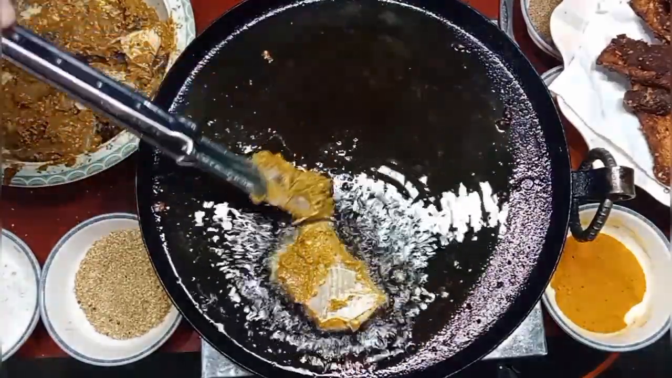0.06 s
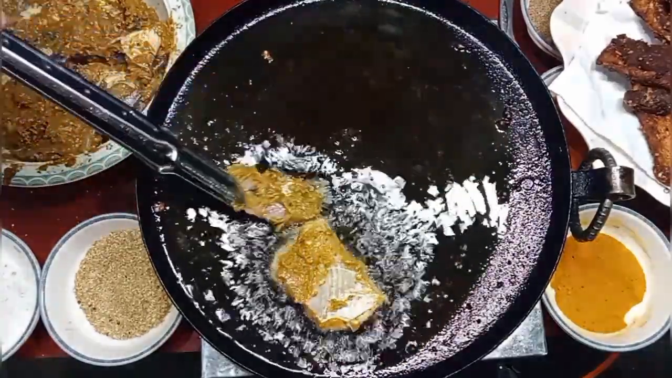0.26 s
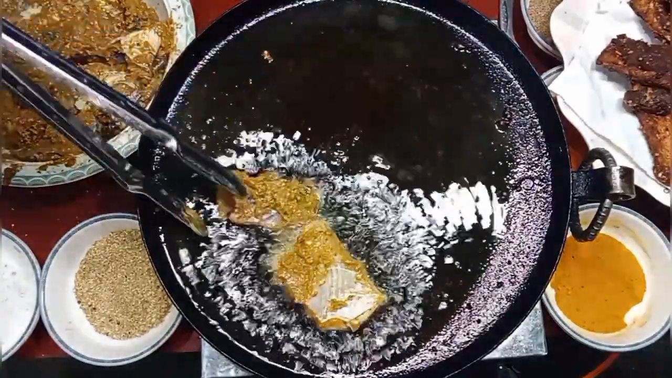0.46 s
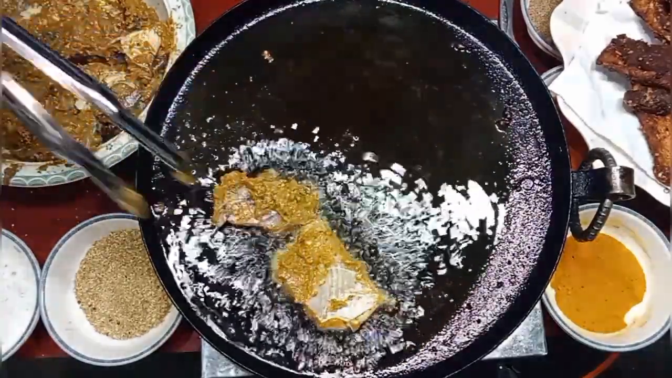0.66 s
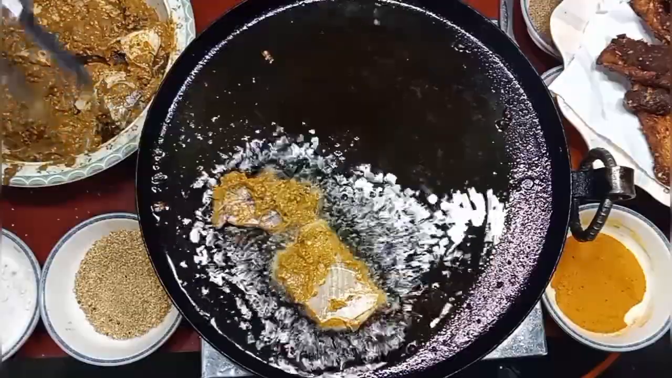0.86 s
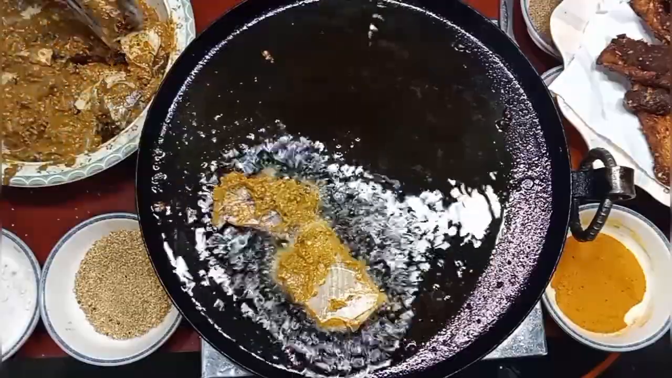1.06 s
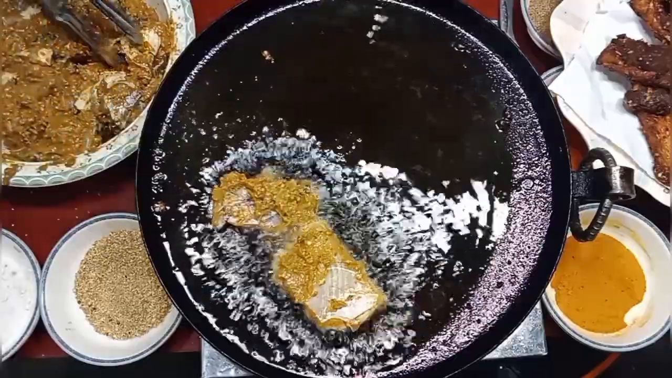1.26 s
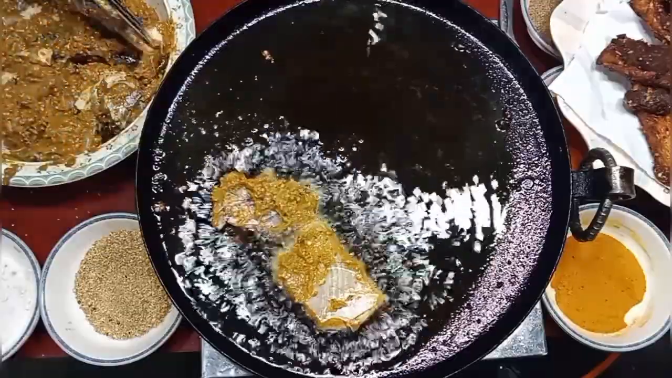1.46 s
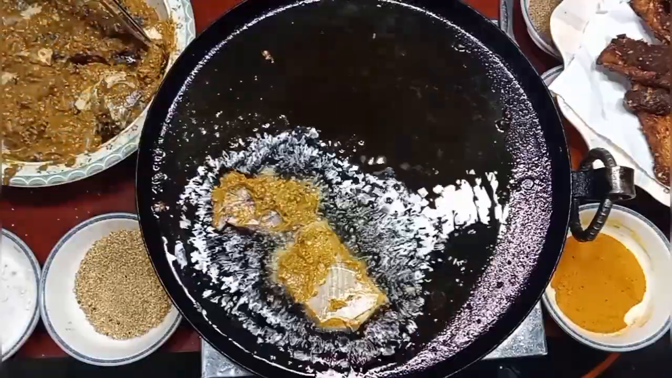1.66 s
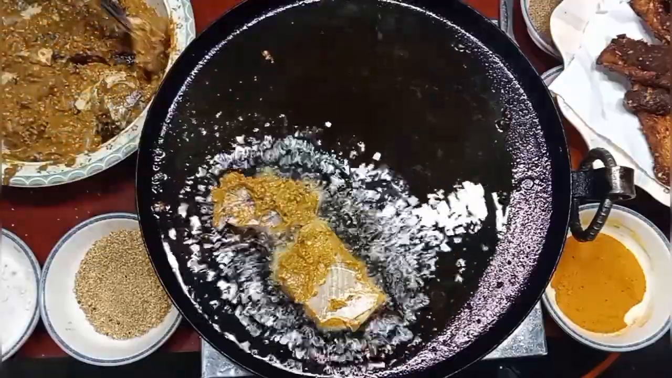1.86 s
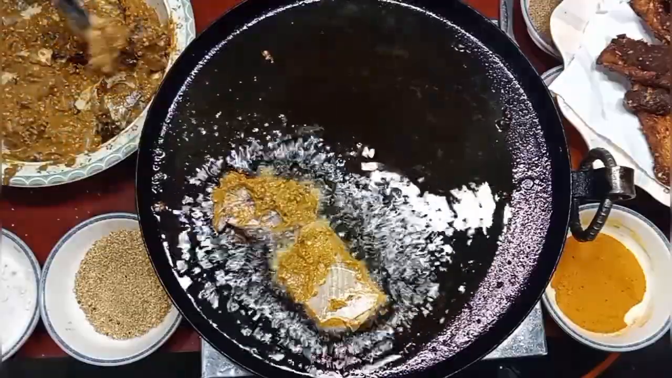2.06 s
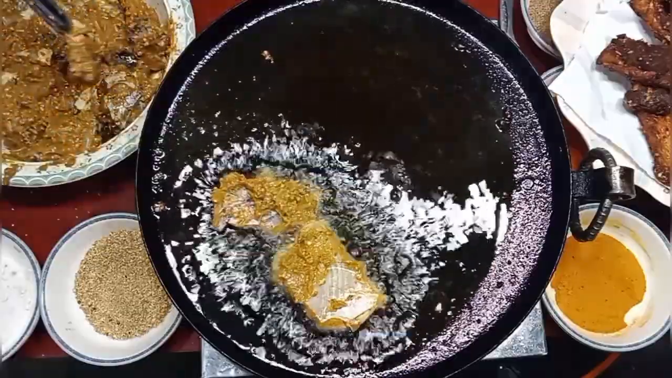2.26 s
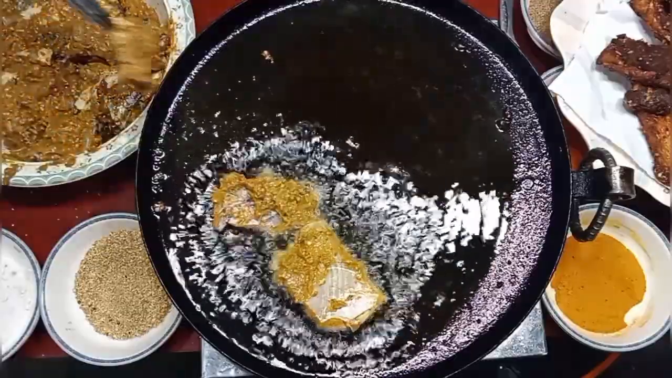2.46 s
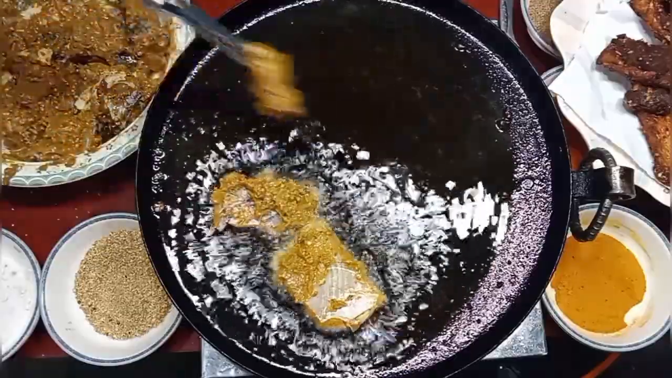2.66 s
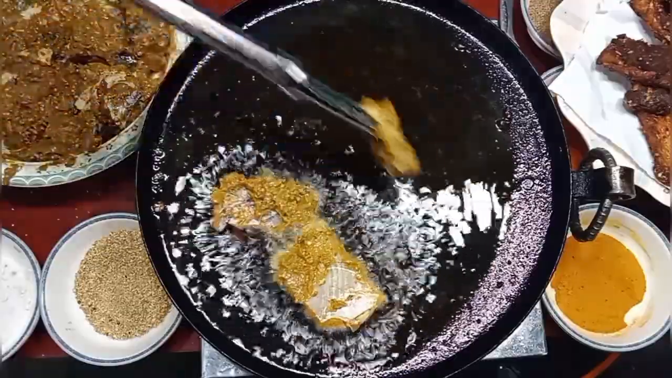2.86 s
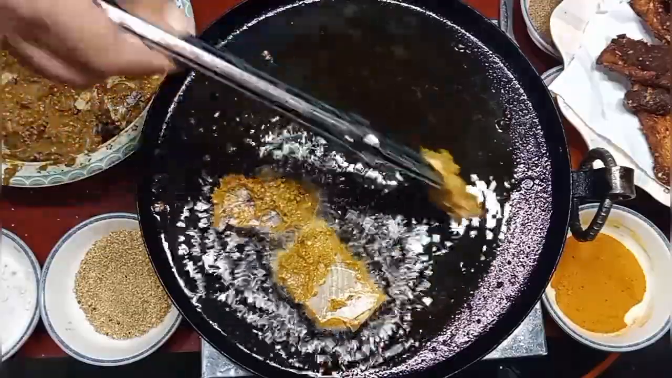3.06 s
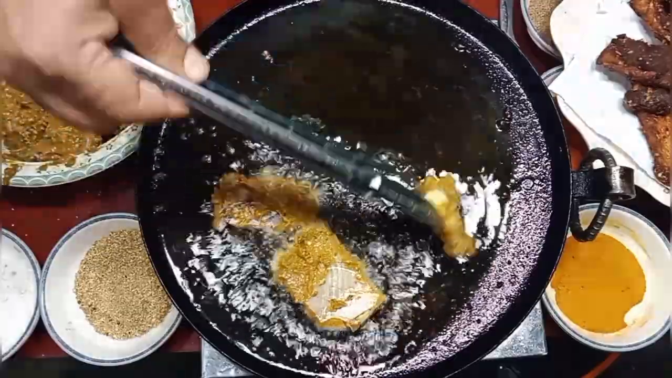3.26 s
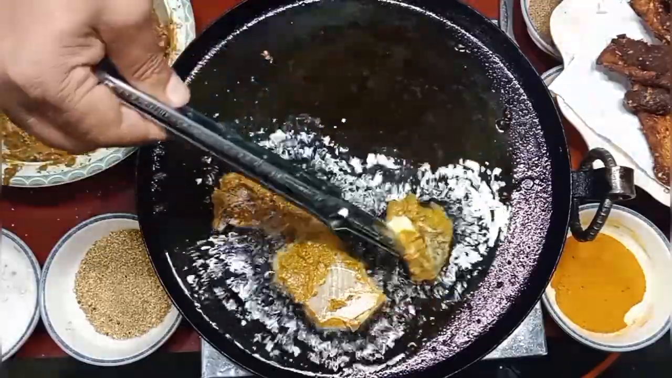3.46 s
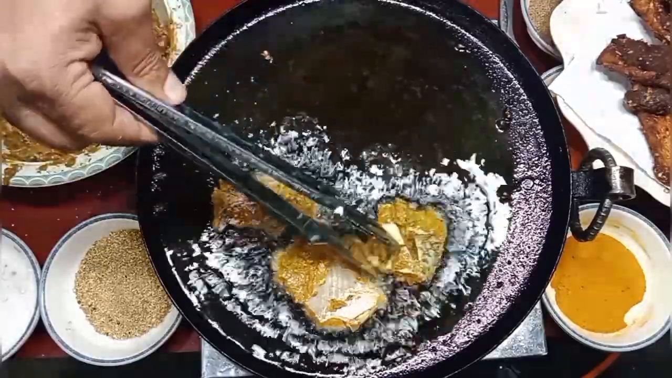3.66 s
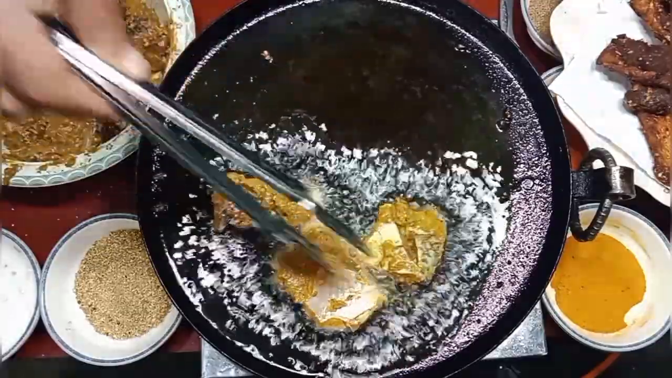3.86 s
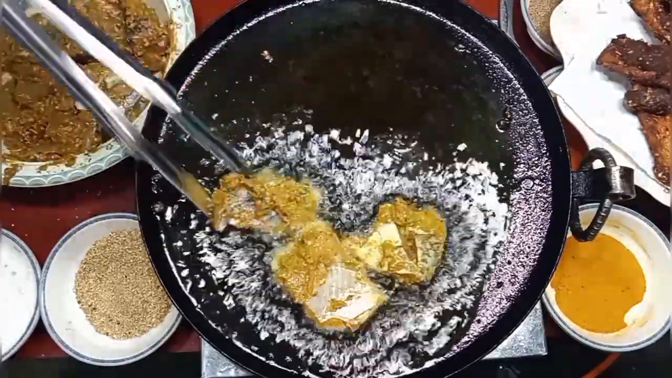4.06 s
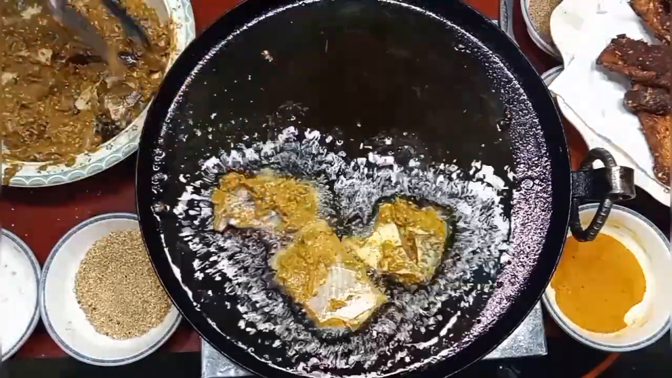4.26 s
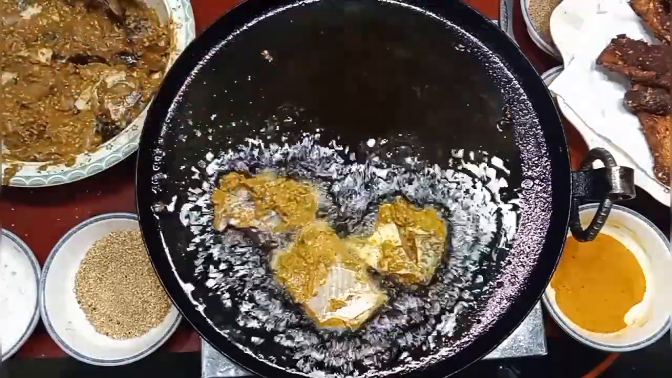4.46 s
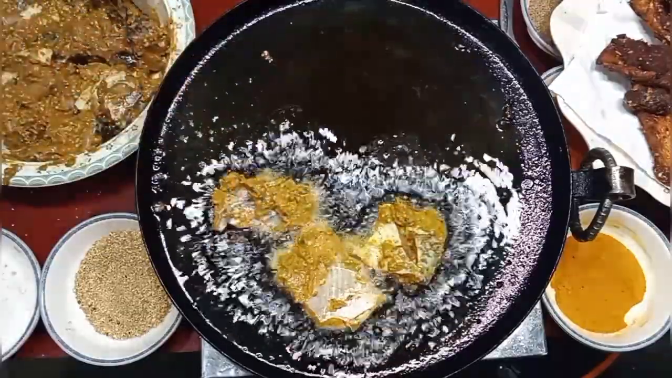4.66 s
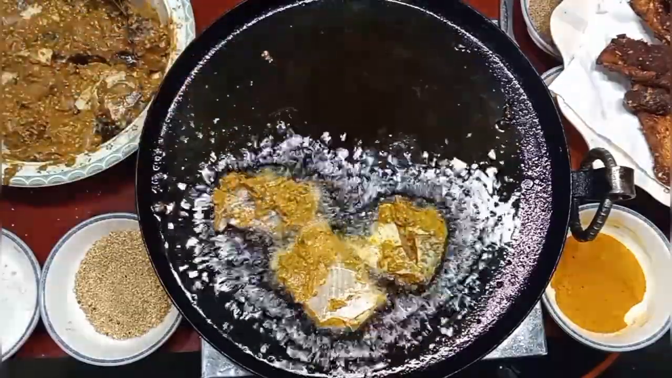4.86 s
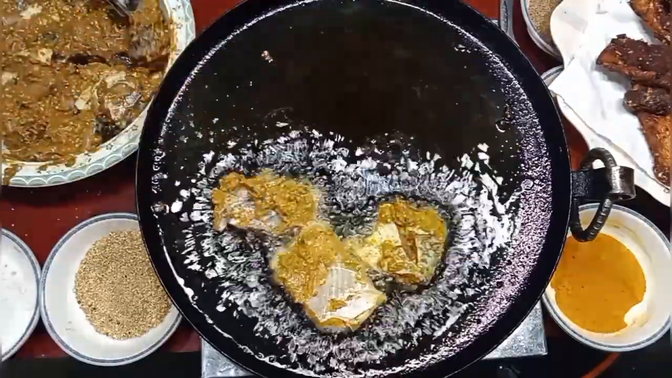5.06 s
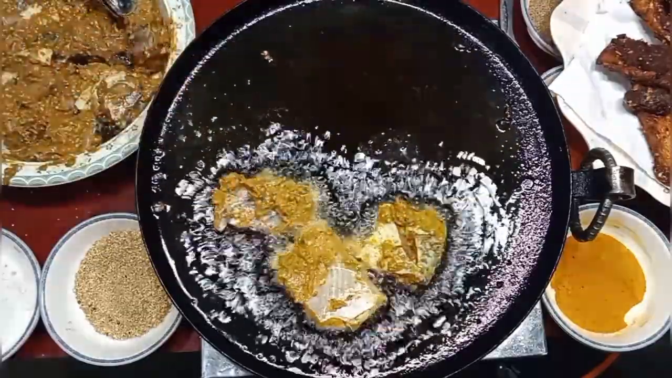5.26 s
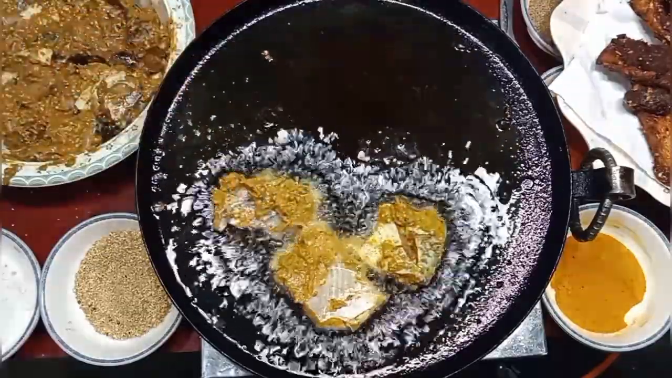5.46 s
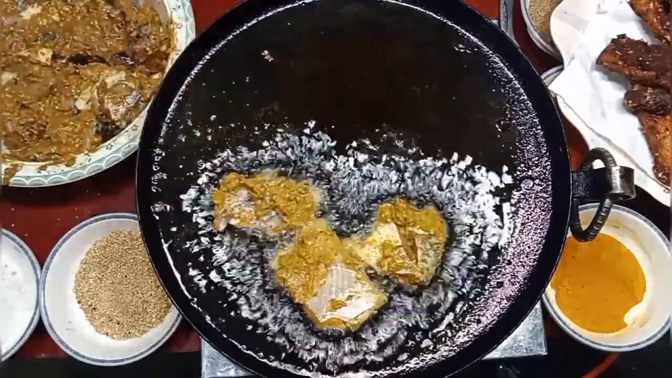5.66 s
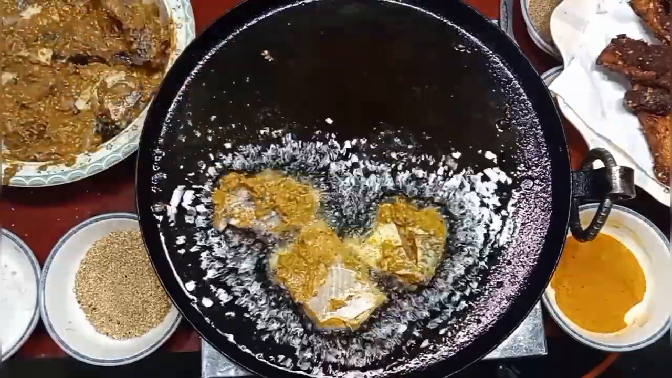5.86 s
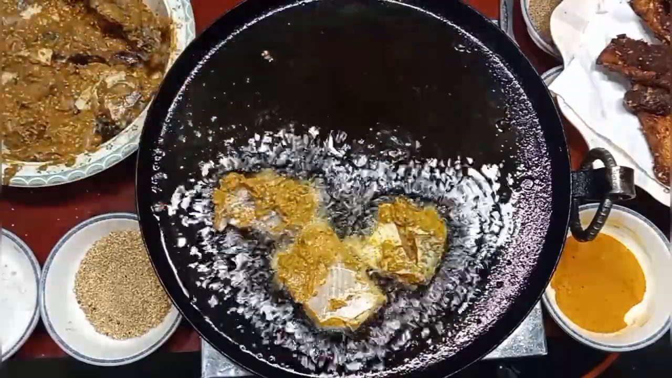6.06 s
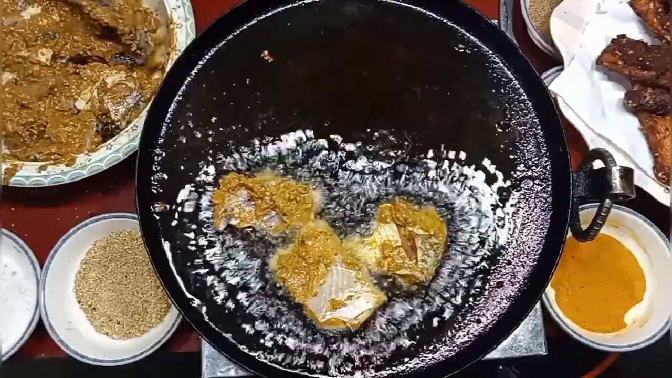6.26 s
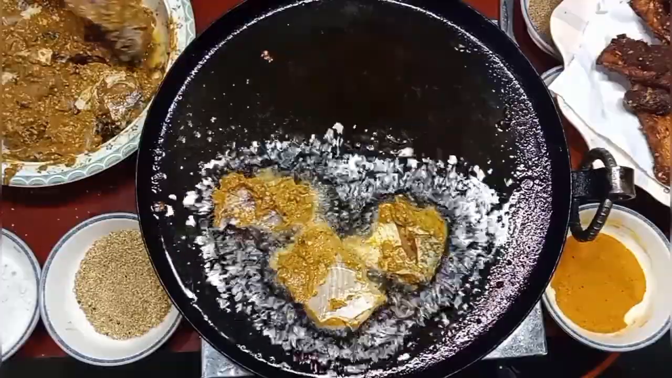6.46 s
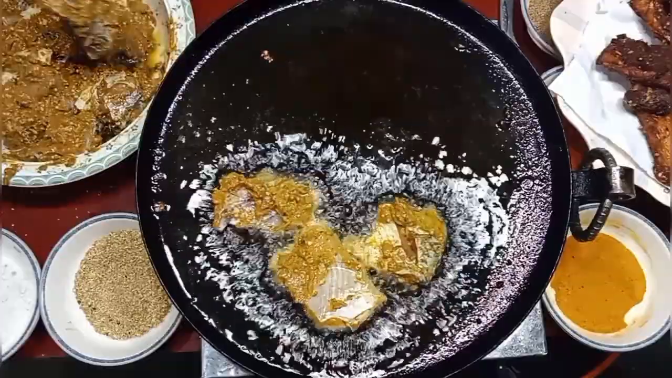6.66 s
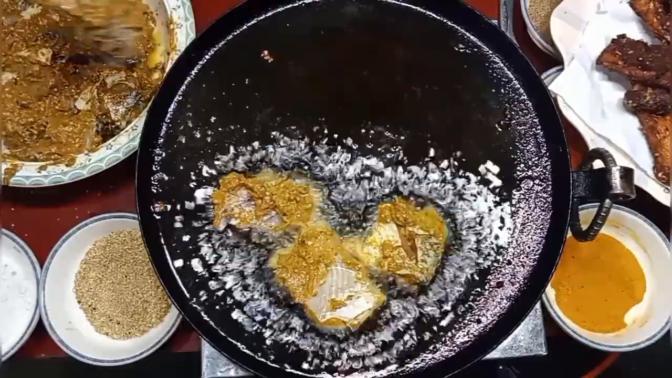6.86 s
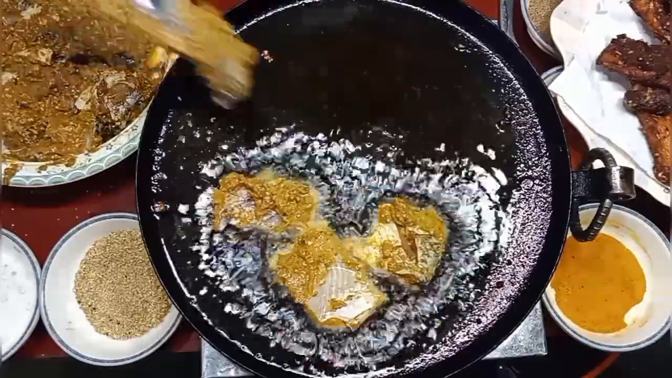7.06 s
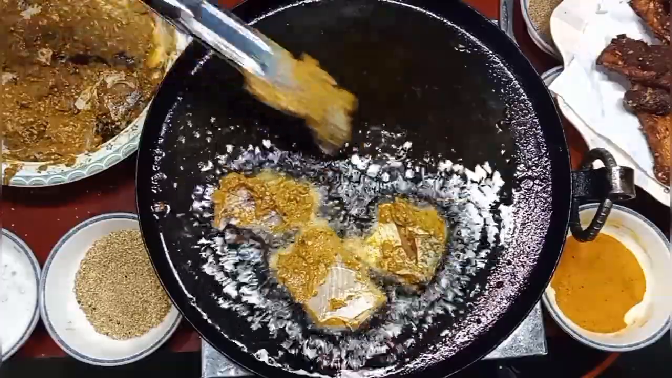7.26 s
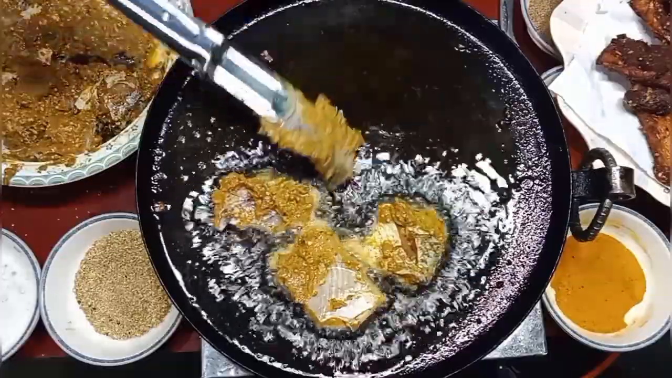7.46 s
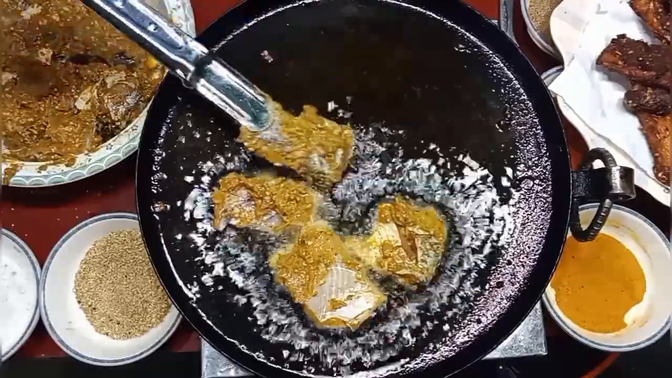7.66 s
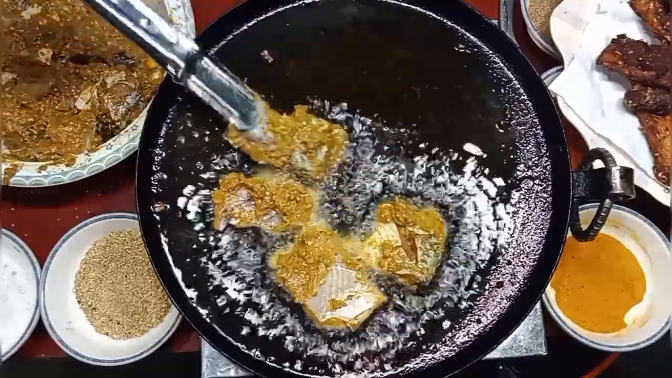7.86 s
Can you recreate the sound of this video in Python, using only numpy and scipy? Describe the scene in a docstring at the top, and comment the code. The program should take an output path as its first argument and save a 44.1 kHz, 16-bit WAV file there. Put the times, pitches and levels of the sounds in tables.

```python
"""Fish frying on a griddle

Coated pieces of raw fish fry in hot oil on a wide iron griddle, heard from close above.
The sizzle is thousands of tiny damped tones, with louder pops, rough steam glugs and low bubbling.
It flares and deepens as tongs lay in new pieces, and drops away in brief lulls.
Once the tongs knock on the bowl of fish: its modes ring, blurred. Kitchen echo and faint air lie around it."""
import sys
import numpy as np
from scipy import signal
from scipy.fft import rfft, irfft, next_fast_len
from scipy.io import wavfile
from scipy.ndimage import uniform_filter1d, map_coordinates

SR = 44100
rng = np.random.default_rng(int(sys.argv[2]) if len(sys.argv) > 2 else 0)


def store_wav(level_fs):
    """Save 16-bit WAV to argv[1]."""
    pcm = np.round(np.clip(np.atleast_2d(level_fs), -1, 1) * 32767)
    wavfile.write(sys.argv[1], SR, pcm.T.astype(np.int16))


N = 349272  # length [samples]


def amp(db):
    """Decibels to gain."""
    return 10 ** (np.asarray(db) / 20)


def unit(x):
    """Scale to an rms of 1."""
    return x / np.sqrt(np.mean(x ** 2) + 1e-20)


def along(points, hz):
    """Read a curve of (frequency, value) points on a logarithmic frequency axis."""
    f, v = np.transpose(points)
    return np.interp(np.log(hz + 1), np.log(f + 1), v)


def over_time(points):
    """Read a curve of (time, value) points at every sample."""
    return np.interp(np.arange(N) / SR, *np.transpose(points))


def wobble(rate):
    """A smooth random curve with the given number of random knots a second."""
    knots = rng.standard_normal(int(N * rate / SR) + 4)
    return map_coordinates(knots, [np.arange(N) * rate / SR])


def coloured(x, gain):
    """Filter with the given gain over frequency; nothing sounds before its cause (minimum phase)."""
    m = 2 * next_fast_len(N // 2 + SR // 4)
    log_gain = np.log(np.maximum(gain(np.fft.rfftfreq(m, 1 / SR)), 1e-6))
    cepstrum = irfft(log_gain, m)
    # folding the cepstrum onto positive times makes the filter causal
    cepstrum[1:m // 2] *= 2
    cepstrum[m // 2 + 1:] = 0
    return irfft(rfft(x, m) * np.exp(rfft(cepstrum)), m)[:N]


def coloured_by(x, points):
    """Filter with a gain curve of (frequency [Hz], gain [dB]) points."""
    return coloured(x, lambda hz: amp(along(points, hz)))


def resonances(modes):
    """Gain of a few steep-sided resonances, each (frequency [Hz], width [Hz], gain [dB])."""
    return lambda f: sum(amp(db) / (1 + ((f - hz) / width) ** 2) ** 2 for hz, width, db in modes)


def bursts(rate, spread_db, cap_db, pitch_hz, scatter, cycles, size=160):
    """Bubbles bursting at random, each a damped sine of its own pitch, life and strength; rms 1."""
    count = int(rate * N / SR)
    start = rng.integers(0, N, count)
    hz = np.clip(pitch_hz * np.exp(scatter * rng.standard_normal(count)), 900, SR / 2.5)
    life = cycles * np.exp(rng.standard_normal(count) / 2)
    strength_db = np.minimum(spread_db * rng.exponential(size=count), cap_db)
    strength = amp(strength_db) * rng.choice([-1, 1], count)
    turns = hz[:, None] * np.arange(size) / SR
    rings = np.sin(2 * np.pi * turns) * np.exp(-turns / life[:, None]) * np.linspace(1, 0, size)
    # long-lived bubbles spread the same energy over more cycles
    rings *= (strength / np.sqrt(life))[:, None]
    places = start[:, None] + np.arange(size)
    return unit(np.bincount(places.ravel(), rings.ravel(), N)[:N])


def patchy(x, depth_db, size=1024):
    """Groups of like-sized bubbles come and go: random patches of gain over pitch and time."""
    # patches of about 200 Hz by 50 ms; a smaller size makes them wider and briefer
    z = signal.stft(x, nperseg=size, noverlap=size * 3 // 4)[2]
    field = uniform_filter1d(rng.standard_normal(z.shape), size=5, axis=0)
    field = uniform_filter1d(field, size=9, axis=1)
    return signal.istft(z * amp(depth_db * unit(field)), nperseg=size, noverlap=size * 3 // 4)[1][:N]


def wavering(t, hz, width_hz):
    """A rough ring: a tone whose phase and strength wander at a speed set by the bandwidth."""
    parts = [map_coordinates(k, [t * width_hz], mode="wrap") for k in rng.standard_normal((2, 256))]
    drift = parts[0] + 1j * parts[1]
    return np.real(drift / np.sqrt(np.abs(drift) + 1e-9) * np.exp(2j * np.pi * hz * t))


def strays(boil_db, over_db, spread_db, pitch_hz, scatter, length_s, count):
    """Lesser events at random moments, louder in a harder boil: rows (s, dB, pitch Hz, length s)."""
    at = rng.integers(0, N, count)
    level, pitch, length = np.clip(rng.standard_normal((count, 3)), -2, 2).T
    level_db = boil_db[at] + over_db + spread_db * level
    return list(zip(at / SR, level_db, pitch_hz * np.exp(scatter * pitch), length_s * np.exp(length / 2)))


STEADY_DB = -41.5  # the sizzle of pieces that have settled
FLARE_RISE_S, FLARE_FADE_DB_PER_S = 0.05, 11  # a flare builds fast and fades as the coating dries
LULL_EDGE_S = 0.013  # how fast a lull sets in and ends
# Wet fish meets the oil, first with an edge and then lying flat:
# (time [s], flare level [dB], hold before the fade [s])
PIECES = [(0.0, -39.5, .72), (3.182, -36, .75), (3.467, -37.5, .45), (7.473, -39.5, .5), (7.64, -37, .3)]
# The sizzle drops away for a moment: (start [s], end [s], depth [dB], less if the lull is very short)
LULLS = [(2.426, 2.545, 6), (2.527, 2.604, 1.5), (2.606, 2.685, 7.5), (2.729, 2.88, 6), (2.905, 3.012, 3.5),
         (5.258, 5.305, 8.5), (6.56, 6.591, 7.5), (6.723, 6.824, 2.5), (6.952, 7.027, 3.5),
         (7.25, 7.287, 3.5)]


def boil():
    """How hard the oil boils, in dB: a steady sizzle, a flare for each new piece, and brief lulls."""
    t = np.arange(N) / SR
    power = amp(STEADY_DB) ** 2
    for s, db, hold in PIECES:
        rise = np.clip((t - s) / FLARE_RISE_S, 0, 1)
        flare_db = db - FLARE_FADE_DB_PER_S * np.maximum(t - s - hold, 0)
        power = power + rise * amp(flare_db) ** 2
    step = lambda s: np.tanh((t - s) / LULL_EDGE_S) / 2
    lull_db = sum(depth * (step(start) - step(end)) for start, end, depth in LULLS)
    return 10 * np.log10(power) - lull_db + .5 * wobble(15)


# Colour of the fine bursts as recorded: (frequency [Hz], gain [dB])
FIZZ_COLOUR = [(700, -52.5), (1300, -22.5), (1900, -12.5), (2400, -5), (3700, -1.5), (5000, -1), (5900, -2),
               (7300, 2), (8800, 2.5), (9500, -2), (10300, 0.5), (11600, -5.5), (12900, -0.5), (14000, -9),
               (15400, -3.5)]


def sizzle(boil_db):
    """Fine fizz under dry crackle, sharp ticks and ringing spits; a harder boil merges them into the bed."""
    fizz = bursts(rate=6000, spread_db=3.5, cap_db=13, pitch_hz=6100, scatter=0.7, cycles=0.9, size=48)
    crackle = bursts(rate=700, spread_db=6, cap_db=16, pitch_hz=5300, scatter=0.55, cycles=1.15, size=64)
    ticks = bursts(rate=70, spread_db=6, cap_db=15, pitch_hz=11000, scatter=0.25, cycles=1.3, size=32)
    spits = bursts(rate=99, spread_db=1.5, cap_db=5.5, pitch_hz=4600, scatter=0.4, cycles=9, size=400)
    # bubbles break in small, quick clumps
    clumps = amp(wobble(150))
    flare_db = boil_db - np.mean(boil_db)
    # now and then a raft of fine bubbles goes in one brief spurt
    spurts_db = np.clip(7 * (wobble(170) - 1.4), 0, 6)
    fizz = patchy(fizz, depth_db=1.6, size=160)
    bed = amp(-4.0 + 0.059 * flare_db + spurts_db) * unit(coloured_by(fizz, FIZZ_COLOUR))
    sharp = crackle + 0.36 * ticks + .28 * spits
    sparks = amp(-4.0 - 0.17 * flare_db) * unit(coloured_by(sharp, FIZZ_COLOUR))
    return amp(boil_db) * clumps * (bed + sparks)


SIMMER_DB, SIMMER_GROWS = 2, 1  # gain of the bubbling; its dB per dB of the boil's quick rises and lulls
# Slow course of the lower, bubbling part of the sizzle, before that gain: (time [s], level [dB])
SIMMER_LEVEL = [(0.0, -52.5), (0.8, -52.5), (1.25, -53.5), (1.45, -57.5), (1.85, -55), (2.2, -55),
                (2.53, -62.5), (3.0, -62), (3.13, -57), (3.19, -53.5), (3.38, -49.5), (3.6, -45),
                (3.97, -50), (4.2, -50.5), (4.94, -52), (5.18, -56), (6.42, -55), (6.93, -57),
                (7.41, -56.5), (7.78, -47), (7.92, -43)]


def bubbling(boil_db):
    """Level of the larger bubbles in dB: a slow course, plus the quick rises and lulls of the boil."""
    quick_db = boil_db - uniform_filter1d(boil_db, size=SR // 3, mode="nearest")
    return over_time(SIMMER_LEVEL) + SIMMER_DB + SIMMER_GROWS * quick_db + .5 * wobble(15)


# The griddle's resonances that larger bubbles sound: (frequency [Hz], width [Hz], gain [dB])
PAN_MODES = [(1045, 134, -4.5), (1229, 83, -4.5), (1453, 95, 0), (1640, 240, -8), (1866, 180, -0.5),
             (2190, 135, -7.5), (2520, 91, -2)]


def simmer(boil_db):
    """A dense crowd of larger bubbles sounds the griddle's resonances."""
    large = bursts(rate=2200, spread_db=2.5, cap_db=9, pitch_hz=1800, scatter=0.3, cycles=1, size=128)
    ringing = patchy(coloured(large, resonances(PAN_MODES)), depth_db=3)
    return amp(bubbling(boil_db) - 3.0) * unit(ringing)


PLOP_DB, PLOP_HZ = -11, 1880  # level against the bubbling, typical pitch


def plops(boil_db):
    """Now and then one large bubble snaps open above the rest of the bubbling."""
    snaps = bursts(rate=70, spread_db=6, cap_db=11.0, pitch_hz=PLOP_HZ, scatter=0.28, cycles=0.34, size=96)
    # (Hz, dB)
    colour = [(600, -33.0), (1000, -20.0), (1300, 5.0), (2400, -2.0), (6000, -16)]
    return amp(bubbling(boil_db) + PLOP_DB) * unit(coloured_by(snaps, colour))


# The griddle's deepest resonances: (frequency [Hz], width [Hz], gain [dB])
DEEP_MODES = [(425, 48, -25), (498, 137, -6.5), (727, 110, -3.5), (1038, 170, 0)]


def murmur(boil_db):
    """The griddle's deepest resonances swell faster than the bubbling, so they mostly speak in a hard boil."""
    simmer_db = bubbling(boil_db)
    deep = bursts(rate=900, spread_db=5.5, cap_db=16.5, pitch_hz=1210, scatter=0.36, cycles=0.6, size=64)
    flare_db = simmer_db - np.mean(simmer_db)
    ringing = patchy(coloured(deep, resonances(DEEP_MODES)), depth_db=4.5)
    return amp(simmer_db - 24.0 + 0.5 * flare_db) * unit(ringing)


EDGE_DB_PER_HZ = 0.1  # how steeply the frying falls below its lower edge, down to 30 dB
EDGE_WANDER_HZ, GURGLE_DB = 85, 2.5  # how far the edge wanders; how much the gurgle just above it stands out
# Lower edge of the frying, before its wandering: (time [s], frequency [Hz])
LOWER_EDGE = [(0.0, 1380), (0.1, 1110), (0.6, 990), (0.72, 1210), (1.25, 1070), (1.5, 1300), (2.3, 1240),
              (2.65, 1480), (3.12, 1490), (3.22, 1120), (3.55, 1010), (4.1, 1110), (4.6, 1260), (5.1, 1357),
              (6.15, 1240), (6.5, 1370), (7.52, 1306), (7.72, 1020)]


def lower_edged(x):
    """The frying ends in a steep, wandering lower edge, with a gurgle just above it."""
    hz, t, z = signal.stft(x, SR, nperseg=512, noverlap=384)
    slow = lambda rate: np.interp(t, np.arange(N) / SR, wobble(rate))
    edge_hz = np.interp(t, *np.transpose(LOWER_EDGE)) + EDGE_WANDER_HZ * slow(13)
    below = edge_hz - hz[:, None]
    gurgle_db = GURGLE_DB * np.maximum(1 + slow(22), 0) * np.exp(-((below + 40) / 130) ** 2)
    gain_db = gurgle_db - np.clip(below * EDGE_DB_PER_HZ, 0, 30)
    return signal.istft(z * amp(gain_db), SR, nperseg=512, noverlap=384)[1][:N]


# Gain of the treble, fading in from 8.5 kHz and full from 11 kHz: (time [s], level [dB])
TREBLE_LEVEL = [(0, 0.5), (1.4, 1.5), (2.5, -1.2), (3.7, 1.5), (5.2, -0.9), (7.0, 0), (7.9, 1)]
# The quiet sizzle briefly sounds hollow:
# (middle [s], length each side [s], pitch [Hz], width each side [Hz], depth [dB])
HOLLOWS = [(2.647, 0.058, 2900, 400, 8), (2.96, .04, 2250, 250, 12)]


def shaded(x):
    """The top of the sizzle slowly brightens and dulls; its middle twice turns hollow for a moment."""
    hz, t, z = signal.stft(x, SR, nperseg=512, noverlap=384)
    hz = hz[:, None]
    treble_db = np.interp(t, *np.transpose(TREBLE_LEVEL)) * np.clip((hz - 8500) / 2500, 0, 1)
    hollow_db = sum(depth * np.exp(-((t - s) / length) ** 2 - ((hz - pitch) / width) ** 2)
                    for s, length, pitch, width, depth in HOLLOWS)
    return signal.istft(z * amp(treble_db - hollow_db), SR, nperseg=512, noverlap=384)[1][:N]


# Colour of the kitchen air: (frequency [Hz], relative level [dB per Hz])
AIR_COLOUR = [(20, 1.5), (60, -5), (120, 3), (400, 1.5), (900, 7.5), (2000, -6), (8000, -33)]


def air():
    """Faint, steady noise of the kitchen air."""
    return amp(-79.0) * unit(coloured_by(rng.standard_normal(N), AIR_COLOUR))


# How long the kitchen walls answer: (frequency [Hz], time to fall 60 dB [s])
ROOM_DECAY = [(300, 0.24), (2000, 0.22), (6000, 0.091), (14000, 0.041)]


def kitchen(x):
    """The walls answer with a short noise tail whose treble dies first; its fine detail is redrawn every 0.2 s."""
    out, hop = np.zeros(N + SR), SR // 5
    x, fade = np.pad(x, (hop, 2 * hop)), signal.windows.hann(2 * hop, sym=False)
    # overlapping stretches of sound each get a new random tail
    for start in range(0, N + hop, hop):
        hz, t, z = signal.stft(rng.standard_normal(SR // 3), SR, nperseg=256)
        decay = amp(-60 * t / along(ROOM_DECAY, hz)[:, None])
        tail = signal.istft(z * decay, SR, nperseg=256)[1]
        stretch = x[start:start + 2 * hop] * np.sqrt(fade)
        answer = signal.fftconvolve(stretch, tail / np.linalg.norm(tail))
        out[start + SR // 400:][:len(answer)] += answer  # 2.5 ms late
    return out[hop:][:N]


# Lesser pops: peak over the boil, typical pitch and nominal ring time
STRAY_POP_DB, STRAY_POP_HZ, STRAY_POP_T60_S = 13.5, 4560, 0.0022
STRAY_POP_GROWS = 0.57  # dB that lesser pops gain per dB of flare; in a lull they sink with the boil
OVERTONE_RATIO, SNAP_T60_S = 2.09, .0011  # second mode over the first; a ring this short is mostly snap
SNAP_BODY, SNAP_BODY_HZ = 0.17, 2360  # the duller swing under a snap: share and pitch
# The loudest drops of water bursting in the oil, before colouring:
# (time [s], peak level [dB], pitch [Hz], nominal ring time [s], strength of the overtone [0-1])
LOUD_POPS = [(0.0221, -17, 7800, 0.0009, .1), (0.143, -22, 13000, 0.02, 0),
             (0.1863, -13.5, 3540, .0032, 0.54), (0.2881, -21, 3400, .008, 0.25),
             (0.352, -23, 7440, .004, 0), (0.358, -27, 1480, 0.0042, 0.4), (0.3786, -12, 4300, 0.0019, 1),
             (0.4407, -21, 3670, .002, .4), (0.4586, -11, 3940, 0.0022, 0.86),
             (0.5448, -23, 8000, .004, 0.2), (0.5463, -6.5, 5300, 0.001, 1), (0.6624, -13, 4200, .0015, .7),
             (0.717, -17.5, 7100, 0.0022, .1), (0.8029, -9, 4900, 0.0018, .5),
             (0.8204, -12.5, 12600, .0016, 0), (0.841, -22, 5700, 0.0036, .1),
             (1.0499, -21.5, 14400, 0.0025, 0), (1.089, -14, 5200, 0.0015, 0.3),
             (1.1012, -23, 5200, .004, .1), (1.174, -26, 11100, 0.0025, 0),
             (1.2002, -7.5, 5280, 0.0022, .02), (1.3085, -10, 3900, 0.00079, .8),
             (1.3812, -13, 3630, 0.0017, 0.4), (1.3975, -17.5, 6400, 0.0011, .1),
             (1.601, -21.5, 6800, 0.007, 0), (1.617, -20.5, 4300, 0.0093, 0.2),
             (1.663, -17.5, 3660, .0018, 0.5), (1.6763, -16, 5600, 0.0011, .3),
             (1.6829, -11, 4920, 0.00072, .4), (1.6905, -5.5, 4470, .0012, 0.7),
             (1.9333, -14.5, 11800, 0.0012, 0), (2.0205, -28, 11250, .007, 0),
             (2.0545, -18, 12200, .0015, 0), (2.1184, -16.5, 3150, 0.0014, 0.6),
             (2.2715, -23.5, 11700, 0.0019, 0), (2.356, -27.5, 1600, 0.0066, .6),
             (2.418, -26, 2590, 0.0024, .5), (2.5083, -27, 7500, 0.0016, .2), (2.962, -28, 4200, .003, 0.2),
             (2.997, -26, 6750, 0.013, 0), (3.0448, -26, 11600, 0.0027, 0),
             (3.1016, -22, 5370, .0033, 0.14), (3.3196, -18, 5600, 0.00089, 0.3),
             (3.326, -14, 6840, 0.004, 0.2), (3.3275, -20, 3800, .006, 0.3), (3.345, -20, 4020, 0.0036, .4),
             (3.446, -13.5, 4460, 0.001, 0.5), (3.591, -18, 3270, .006, 0.05),
             (3.608, -13, 5400, 0.0016, .2), (3.657, -21, 3700, .0047, .2),
             (3.8012, -14, 4300, 0.0012, 0.4), (3.9015, -15.5, 3660, 0.0072, 0.25),
             (3.9369, -16.5, 3500, .0075, 0.25), (3.9844, -17, 6760, .003, .1),
             (3.9934, -13, 6100, .0007, .2), (4.0017, -18.5, 4900, .0041, 0.1),
             (4.0467, -21.5, 5070, 0.0097, .1), (4.067, -21, 7500, 0.0022, .1),
             (4.1464, -16, 4270, 0.0049, 0.8), (4.275, -22.5, 5500, 0.0087, 0),
             (4.2996, -11, 8840, 0.0022, 0.2), (4.495, -14.5, 4100, 0.0021, .2),
             (4.5428, -19.5, 6660, 0.0028, 0), (4.6242, -24, 4900, 0.004, 0),
             (4.7401, -15, 5300, 0.00064, .3), (4.7464, -17, 6400, 0.0052, .1),
             (4.9034, -26, 14200, .004, 0), (5.0576, -18.5, 10700, 0.0016, 0),
             (5.3144, -27, 11700, .004, 0), (5.595, -28, 2260, 0.0093, .3), (5.597, -25, 4950, .007, 0.1),
             (5.6328, -27, 9800, .004, 0), (5.675, -24, 3600, 0.0012, .5), (5.737, -22, 2700, .005, .8),
             (5.777, -22, 4200, 0.0017, 0.3), (5.826, -29.5, 2670, .018, .2),
             (5.9819, -9.5, 5800, 0.0015, 0), (5.9957, -19, 3630, 0.0053, 0.17),
             (6.088, -13, 4500, 0.00074, 0.7), (6.124, -20, 4150, 0.0013, .3), (6.138, -17, 4040, .001, 1),
             (6.278, -23.5, 4350, 0.0046, .1), (6.411, -23.5, 3060, 0.0081, 0.36),
             (6.535, -16, 3540, 0.0062, 0.22), (6.5888, -22.5, 10200, .0018, 0),
             (6.7034, -23, 4900, 0.0076, 0.2), (6.7741, -22.5, 3700, 0.0027, 0.17),
             (6.788, -19, 4400, 0.0016, 0.1), (7.0337, -19.5, 4190, .016, 0),
             (7.036, -24.5, 2560, 0.015, .1), (7.1779, -24, 4040, 0.023, .1),
             (7.3153, -21, 3940, 0.0019, .5), (7.341, -24, 4060, .008, 0.15),
             (7.3788, -24.5, 10000, 0.0032, 0), (7.4107, -16, 13800, 0.0019, 0),
             (7.489, -22, 3960, .005, 0.3), (7.5014, -21.5, 6400, .003, .1), (7.6286, -20, 6430, .0043, 0),
             (7.6742, -16.5, 6900, .0031, 0), (7.7155, -17, 4500, .0012, .4),
             (7.7286, -15, 6850, .0027, .1), (7.7674, -15, 4400, 0.0013, .3),
             (7.7833, -14.5, 6840, .0012, .1), (7.8827, -16.5, 4030, .0073, .2),
             (7.9037, -17, 13300, .0025, 0)]
# Colour of the pops as recorded: little bass, notched treble: (frequency [Hz], gain [dB])
POP_COLOUR = [(40, -18.5), (150, -21.5), (500, -22), (1000, -9), (1600, 3), (9000, 2), (11600, -2.5),
              (12900, -3), (14000, -8), (15200, -4)]


def pops(boil_db):
    """A drop bursts with a sharp pressure swing; its cavity rings briefly in two modes at a sinking pitch."""
    out, t = np.zeros(N + SR), np.arange(SR // 40) / SR
    heat_db = np.minimum(boil_db, STEADY_DB + STRAY_POP_GROWS * (boil_db - STEADY_DB))
    lesser = strays(heat_db, STRAY_POP_DB, spread_db=1.8, pitch_hz=STRAY_POP_HZ, scatter=0.27,
                    length_s=STRAY_POP_T60_S, count=36)
    for s, db, hz, t60, overtone in LOUD_POPS + [(*row, .25) for row in lesser]:
        phase = 2 * np.pi * hz * np.cumsum(1 + 0.12 * np.exp(-t / 0.00022)) / SR
        second = overtone * (OVERTONE_RATIO * hz < SR / 2) * np.sin(OVERTONE_RATIO * phase)
        # the ring builds up over its first cycle
        build_up = 1 - np.exp(-t * hz / 0.68)
        ring = (np.sin(phase) + second) * amp(-60 * t / (0.7 * t60)) * build_up

        def swing(pitch_hz):
            """One pressure swing, about two thirds of a ring cycle after the start."""
            bend = 2 * (np.pi * pitch_hz * (t - 0.68 / hz)) ** 2 - 1
            return bend * np.exp(-(np.pi * pitch_hz * (t - 0.706 / hz)) ** 2)

        # the shorter the ring, the more violent the snap
        edge = min(SNAP_T60_S / t60, 1.5) ** 2 * swing(7400)
        body = SNAP_BODY * min(2 * SNAP_T60_S / t60, 2) * swing(SNAP_BODY_HZ)
        # flying droplets hiss on the hot iron
        spray = 0.12 * rng.standard_normal(len(t)) * amp(-60 * t / 0.018)
        # a long-lived cavity tears into smaller ones, which roughens its ring
        torn = min(t60 / .017, .93) ** 3
        tearing = wavering(t, hz, width_hz=1820) * amp(-60 * t / (1.03 * t60))
        pop = edge + body + (1 - torn) * ring / np.abs(ring).max() + torn * tearing
        out[round(s * SR):][:len(t)] += amp(db) * (pop / np.abs(pop).max() + spray)
    return coloured_by(out[:N], POP_COLOUR)


GLUG_RISE = 0.022  # share by which a glug's pitch rises over its length
HOLLOW_HZ, HOLLOW_DB = 1140, -3  # the gap under the fish rings along with every pocket
# Lesser pockets: level against the boil, typical pitch and length
STRAY_GLUG_DB, STRAY_GLUG_HZ, STRAY_GLUG_S = -28, 1240, 0.021
# The largest steam pockets escaping from under the fish:
# (middle [s], relative level [dB], pitch [Hz], length [s])
LARGE_GLUGS = [(0.165, -59.5, 1100, 0.071), (0.253, -66, 702, 0.04), (0.337, -53.5, 716, 0.04),
               (0.542, -58.5, 1020, 0.17), (0.683, -72, 439, .04), (0.833, -62, 540, 0.026),
               (0.882, -58, 721, 0.05), (1.228, -65.5, 514, 0.05), (1.449, -59, 710, 0.043),
               (1.695, -50.5, 714, 0.025), (1.73, -58.5, 537, 0.062), (2.133, -55.5, 1105, 0.063),
               (2.388, -58, 713, 0.05), (3.486, -49, 720, 0.04), (3.557, -55.5, 1014, 0.11),
               (3.719, -57, 698, 0.042), (3.922, -69, 524, 0.09), (3.985, -47, 1196, .05),
               (4.433, -62, 491, 0.11), (5.252, -57.5, 1178, .025), (5.753, -56, 1224, 0.04),
               (6.01, -57, 980, 0.024), (6.886, -56, 1217, 0.035), (7.336, -70, 432, 0.035),
               (7.35, -57, 1210, 0.024), (7.462, -56, 1058, 0.048), (7.657, -65, 449, .04),
               (7.73, -51, 760, 0.028), (7.74, -62, 483, .06), (7.808, -57, 763, 0.053),
               (7.81, -61, 417, 0.0302), (7.855, -55, 475, 0.0454), (7.895, -52.5, 515, 0.05)]


def steam(boil_db):
    """Each pocket of steam swells and fades as a short, rough glug that rises a little in pitch."""
    out, t = np.zeros(N + SR), np.arange(SR // 2) / SR
    lesser = strays(boil_db, STRAY_GLUG_DB, spread_db=2.5, pitch_hz=STRAY_GLUG_HZ, scatter=0.094,
                    length_s=STRAY_GLUG_S, count=16)
    for s, db, hz, length in LARGE_GLUGS + lesser:
        swell = np.exp(-2.4 * ((t - 1 / 4) / length) ** 2)
        rising = 1 + GLUG_RISE * (t - 1 / 2) / 2 / length
        # smaller, higher pockets are damped more and so sound broader
        pocket = wavering(t, hz * rising, width_hz=80 + .04 * hz)
        hollow = amp(HOLLOW_DB) * wavering(t, HOLLOW_HZ, width_hz=160)
        out[round(s * SR):][:len(t)] += amp(db + 1.0) * swell * (pocket + hollow)
    # each swell peaks a quarter second in, so shift it back onto its time
    return out[SR // 4:][:N]


# Wet coating meets the oil and boils up at once:
# (time [s], relative level [dB], time to fall 60 dB [s], rise [s], lowest pitch [Hz])
GULPS = [(0.353, -44.5, 0.27, 0.0047, 840), (0.55, -43, 0.22, 0.0036, 895),
         (1.661, -40.5, 0.086, 0.00091, 600), (1.677, -47.5, 0.39, 0.0037, 450),
         (2.1, -45.5, 0.22, .008, 855), (2.356, -45.5, 0.3, 0.0087, 600), (2.687, -58, 0.38, 0.014, 1150),
         (2.885, -57, 0.39, 0.0037, 1000), (3.155, -48, .7, 0.034, 1110), (3.986, -44.5, 0.4, .004, 930),
         (4.425, -48.5, 0.2, .004, 850), (7.41, -48, 0.33, 0.022, 1010), (7.713, -44.5, 0.3, 0.0037, 750)]
# Colour of such a gulp: (frequency [Hz], gain [dB])
GULP_COLOUR = [(300, -32), (500, -8), (700, -9), (1050, 10), (1450, 11.5), (2000, 14.5), (3200, -35),
               (8000, -46)]


def gulps():
    """A sudden crowd of large bubbles that swells and dies away quickly."""
    out, t = np.zeros(N + SR), np.arange(SR) / SR
    crowd = bursts(rate=1500, spread_db=7, cap_db=12, pitch_hz=1250, scatter=0.27, cycles=0.5, size=96)
    crowd = np.pad(unit(coloured_by(crowd, GULP_COLOUR)), (0, SR))
    for s, db, t60, rise, lowest_hz in GULPS:
        fall_db = 60 * np.maximum(t - rise, 0) / t60
        swell = np.minimum(t / rise, 1) * amp(db + 2.5 - fall_db)
        edge = signal.butter(8, lowest_hz, "highpass", fs=SR, output="sos")
        out[round(s * SR):][:SR] += signal.sosfilt(edge, swell * crowd[round(s * SR):][:SR])
    return out[:N]


# Steel tongs against the bowl: (time [s], relative level [dB])
KNOCKS = [(5.3791, -28.5), (5.3814, -31.5)]
# The bowl's ringing modes: (frequency [Hz], relative level [dB], time to fall 60 dB [s])
BOWL_MODES = [(195, -12, 0.19), (305, -12.5, 0.38), (388, -4.5, 0.22), (463, -16, 0.28), (812, -1.5, 0.2),
              (1192, -9, 0.7), (1380, 0, .05), (1630, 10, 0.023), (1906, 6, 0.07), (2010, 9, 0.075),
              (2580, 0, 0.17), (4430, 5, 0.11)]


def knock():
    """The tongs hit the bowl and bounce once; the wet fish in it roughens and damps the ring."""
    out, t = np.zeros(N + SR), np.arange(SR // 2) / SR
    for s, db in KNOCKS:
        # the higher the mode, the more the wet fish blurs it
        ring = sum(amp(level - 60 * t / t60) * wavering(t, hz, width_hz=80 + hz ** 2 / 14000)
                   for hz, level, t60 in BOWL_MODES)
        tick = rng.standard_normal(len(t)) * amp(-60 * t / 0.013)
        out[round(s * SR):][:len(t)] += amp(db - 11.5) * (ring + tick) * (1 - np.exp(-t / 0.0012))
    return coloured_by(out[:N], [(60, -41), (220, -2.0)])


def scene():
    """Griddle and bowl in the kitchen, over faint air noise; the boil drives most layers of the frying."""
    boil_db = boil()
    frying = shaded(lower_edged(sizzle(boil_db) + simmer(boil_db) + plops(boil_db)))
    near = frying + murmur(boil_db) + pops(boil_db) + gulps() + knock()
    return (near + amp(-13.0) * kitchen(near) + steam(boil_db) + air())[None]


TOP_HZ = 15650  # upper band limit


def record(dry):
    """The recorder keeps nothing above its band limit."""
    m = next_fast_len(N + SR // 2)
    return irfft(rfft(dry, m) * (np.fft.rfftfreq(m, 1 / SR) < TOP_HZ), m)[..., :N]


dry = scene()
out = record(dry)
store_wav(out)
```